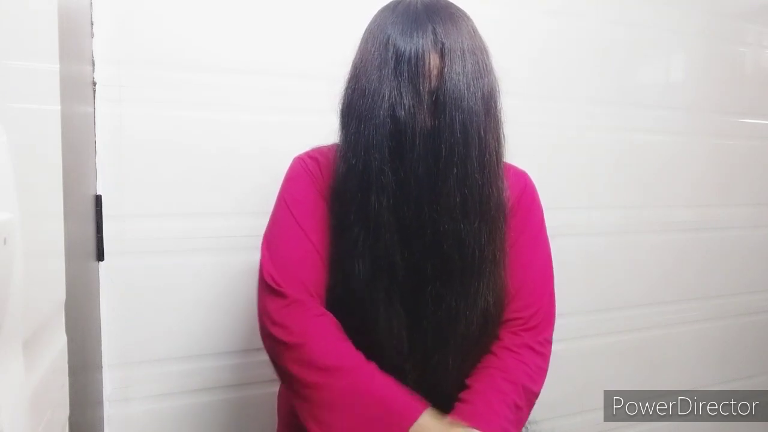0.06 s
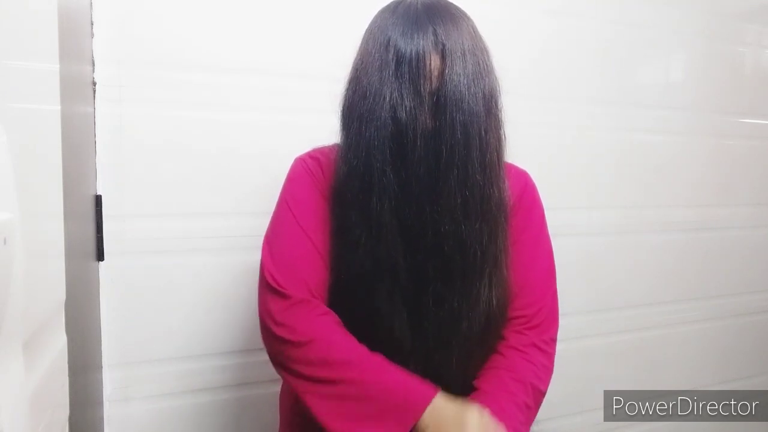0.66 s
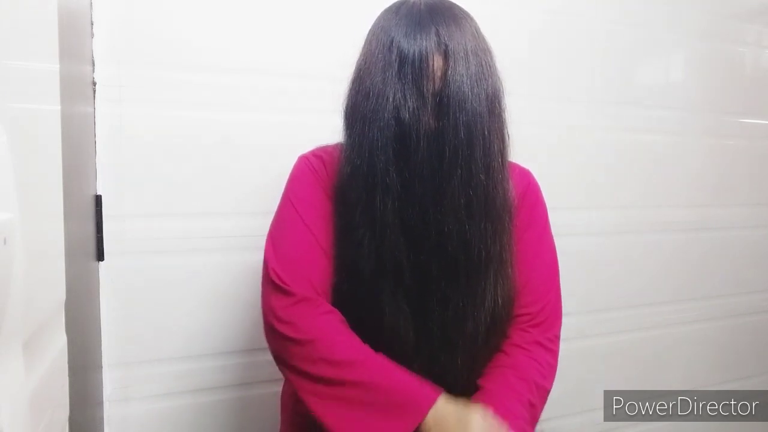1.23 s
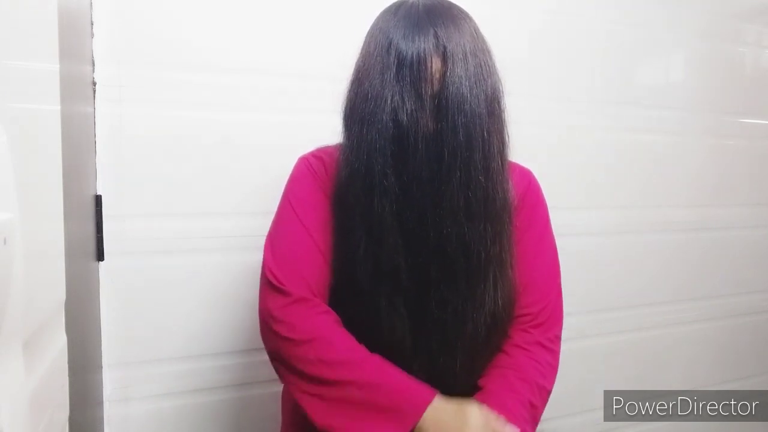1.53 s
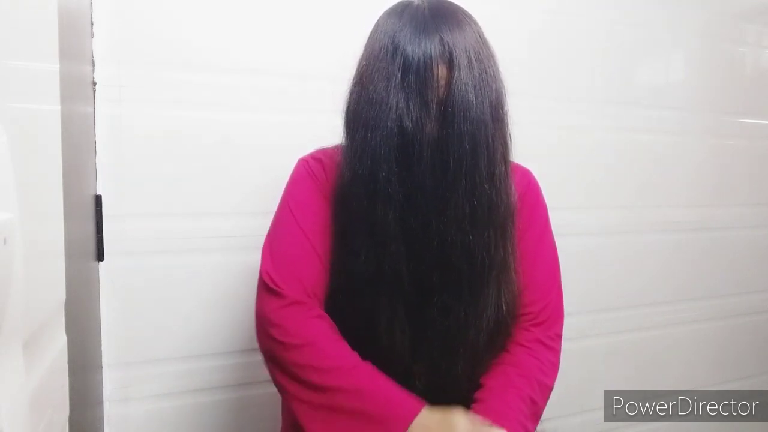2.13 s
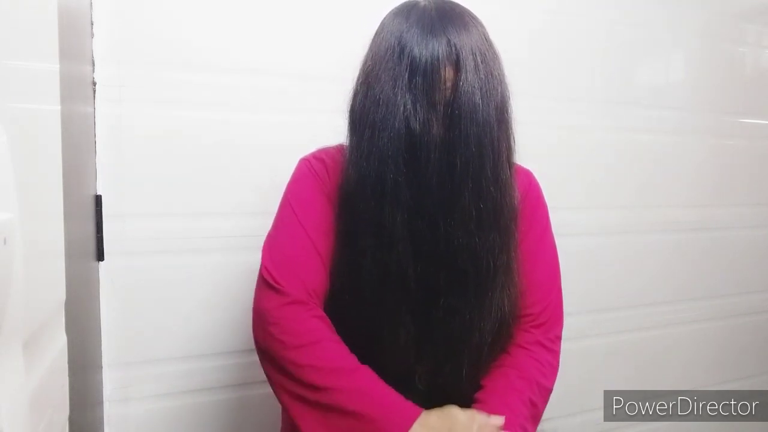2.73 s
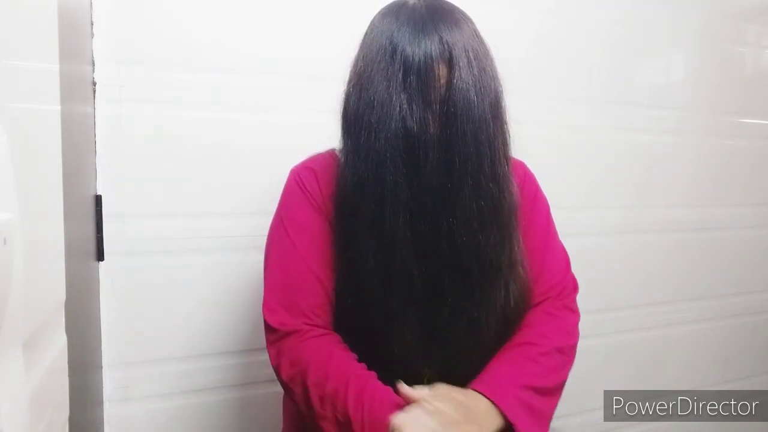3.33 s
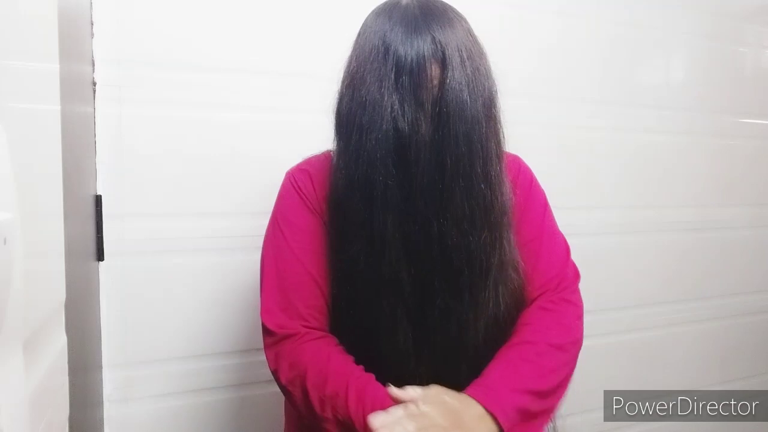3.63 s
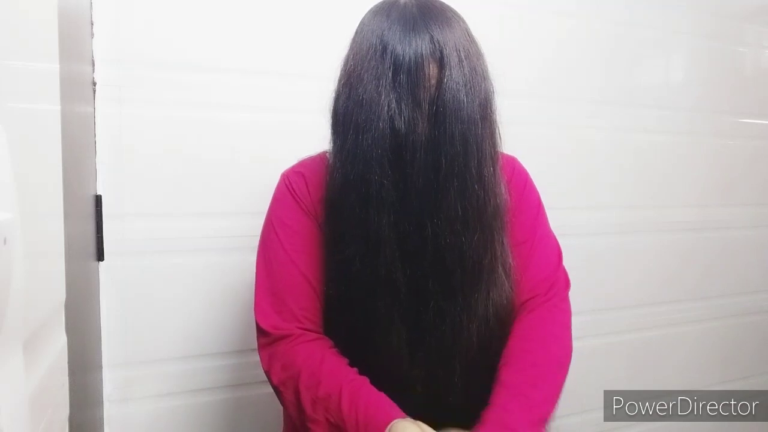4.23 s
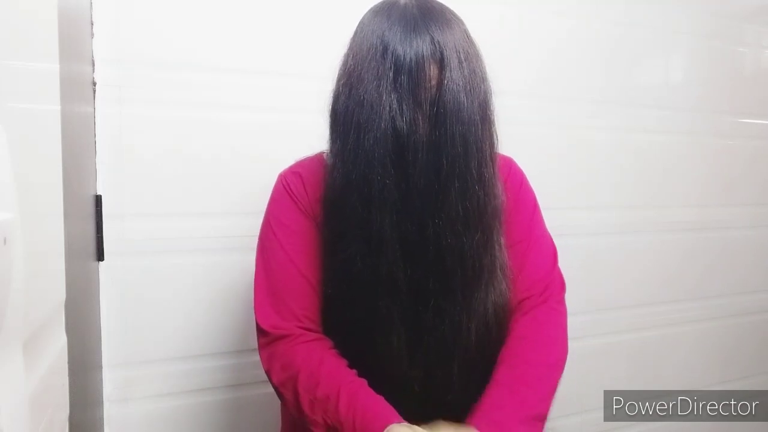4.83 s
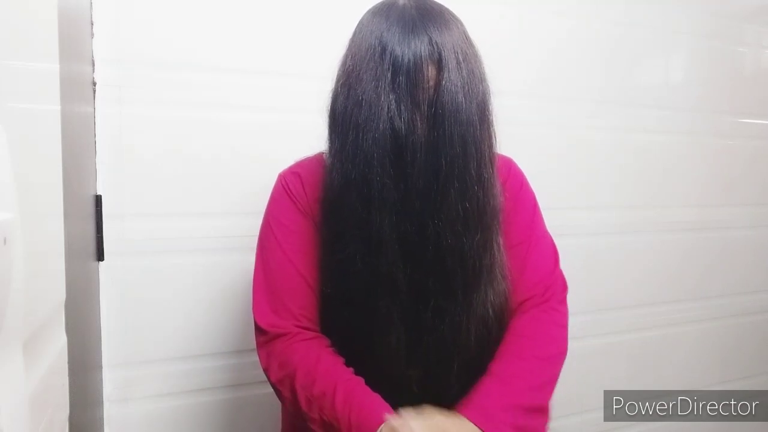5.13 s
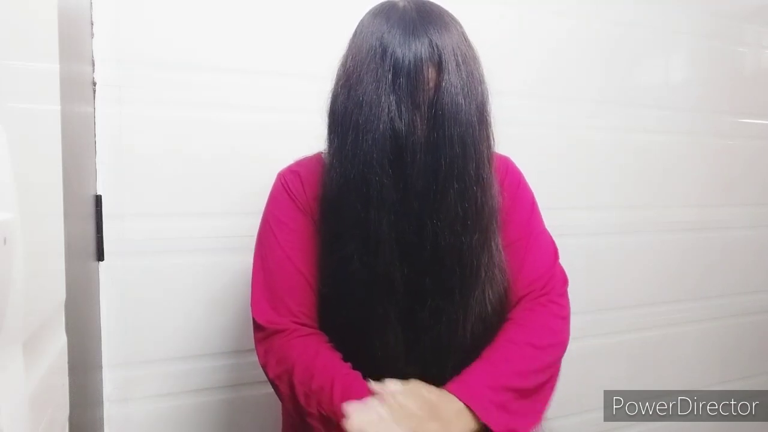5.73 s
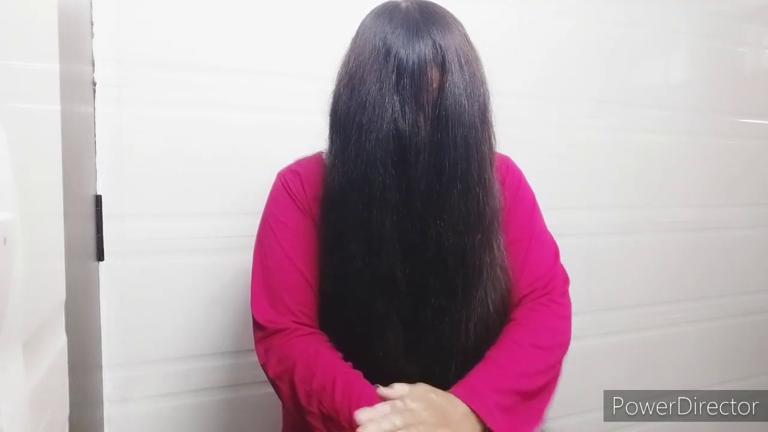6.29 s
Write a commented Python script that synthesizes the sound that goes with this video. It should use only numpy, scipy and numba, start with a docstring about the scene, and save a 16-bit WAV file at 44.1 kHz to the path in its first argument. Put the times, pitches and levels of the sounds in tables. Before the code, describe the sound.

Two oiled palms rub together close to the microphone in a small room with hard, echoing walls and a steady low hum. The strokes are quick and softly hissing, about seven a second, flecked with tiny bubble pops. In the first second, four small wet crackles sound as the oil film tears. A faint, distant two-tone whistle wavers in a few short blasts until about 1.2 seconds. From 1 to 3 seconds the rubbing stays light, with thin high ticks and small slurps of air. It pauses briefly around 3 seconds. From about 3.5 seconds the hands resume and press harder, making a busy run of sticky squelches and fizzing crackles. These are loudest between about 4.5 and 5.6 seconds, then ease a little as the rubbing continues to the end, just after 6 seconds.

```python
"""Oiled palms rubbing and squeezing

Two oiled palms rub together close by in a small room with hard walls. Each stroke hisses softly as
the skin slides. The oil film tears in crackling bursts that ring the air pockets between the hands,
busier and louder in the second half. Thin oil threads tick, and air slurps out of closing gaps.
Behind it all are a low room hum and, at first, a faint far whistle."""
import sys
import numpy as np
from scipy import signal
from scipy.fft import rfft, irfft, next_fast_len
from scipy.io import wavfile
from scipy.ndimage import uniform_filter1d
from numba import njit

SR = 44100
rng = np.random.default_rng(int(sys.argv[2]) if len(sys.argv) > 2 else 0)


def waveform_to_disk(signal):
    """Save audio, clipped to [-1, 1], as 16-bit WAV at the path in sys.argv[1]."""
    frames = np.transpose(np.atleast_2d(signal))
    scaled = np.clip(frames, -1, 1) * 32767
    samples = np.round(scaled).astype(np.int16)
    wavfile.write(sys.argv[1], SR, samples)


N = 280476
TIME = np.arange(N) / SR
BURST = np.arange(2048) / SR  # time within one short sound, in seconds
SNAP_S = .008  # a tear starts this long before its main snap

# Each tear of the oil film: t/s, pocket level/dB, tear time scale/ms, pocket f/Hz,
# palm hollow f/Hz, hollow level/dB, fizz level/dB
FILM_TEARS = [(0.0301, -38.5, 1, 3300, 1100, -45.5, -43), (0.3198, -35.5, 1.35, 3700, 898, -47, -46),
              (0.6011, -31.5, 1.3, 3170, 1590, -40.5, -32), (0.8803, -34.5, 1.6, 3650, 940, -40.5, -40.5),
              (3.5278, -43, 4.6, 4270, 1900, -47, -40.5), (3.5349, -35, 2.2, 4000, 1620, -38.5, -33),
              (3.6674, -37.5, 7.5, 3920, 464, -50, -41.5), (3.7877, -42.5, 1.9, 2830, 1540, -46, -42),
              (3.9184, -32.5, 2.2, 4040, 684, -41, -38), (3.9347, -35.5, 1.6, 4440, 590, -60, -34),
              (4.0439, -37, 1.6, 4000, 1630, -42.5, -39), (4.1756, -34, 1, 4020, 780, -42.5, -45),
              (4.2744, -30.5, 1.5, 4380, 1250, -49, -35), (4.3065, -39, 3.1, 3420, 504, -48, -44),
              (4.4333, -33, 2.7, 4430, 596, -44.5, -50), (4.4416, -36, 4, 3730, 579, -58, -29),
              (4.5468, -24, 1.03, 4320, 1580, -34.5, -36), (4.7, -32, 0.92, 4560, 645, -46, -46),
              (4.7133, -37, 2, 7400, 730, -58, -32), (4.8172, -35.5, 2.4, 3940, 1050, -49, -42),
              (4.8382, -42, 1.9, 4400, 1530, -45, -44), (4.9567, -35, 1.8, 3540, 1370, -46, -36.5),
              (4.9919, -51, 2.2, 5700, 543, -34.5, -28.5), (5.0905, -20, 1.9, 6000, 2030, -40, -22),
              (5.0938, -22, 2.9, 4170, 975, -37, -28), (5.2376, -39, 2.1, 3970, 2000, -48, -39),
              (5.36, -22.5, 2.3, 4900, 2097, -36, -21), (5.5204, -32.5, 2.4, 3800, 715, -44, -33.5),
              (5.6294, -27, 1, 4260, 1530, -42.5, -34), (5.6608, -35.5, 2.5, 2690, 2070, -47, -37),
              (5.7928, -37.5, 2, 3770, 1270, -46.5, -39.5), (5.8397, -46, 5, 2890, 540, -39.5, -42.5),
              (5.9268, -41, 2.4, 2470, 1750, -43, -43), (6.0686, -35, 4.2, 3920, 570, -42, -37),
              (6.1763, -40.5, 1.2, 3800, 1090, -47.5, -42), (6.1975, -39.5, 2, 2460, 1680, -44, -37)]


def undb(db):
    """Turn decibels into a number to multiply by."""
    return 10 ** (np.asarray(db) / 20)


def unit(x):
    """Scale a signal to an average strength (rms) of 1."""
    return x / np.sqrt(np.mean(x ** 2))


def sized(x, db):
    """Give a short sound as much energy as 10 ms of steady sound at level db."""
    return x * undb(db) * np.sqrt(.01 * SR / np.sum(x ** 2))


def at_hz(points, hz):
    """Read between the rows of a (frequency, value) table, on a log-frequency scale."""
    f, value = np.transpose(points)
    return np.interp(np.log(hz + 1), np.log(f), value)


def colour(x, points):
    """Make the lows and highs louder or softer, following rows of f/Hz, gain/dB."""
    size = next_fast_len(2 * len(x), True) // 2 * 2
    gain = undb(at_hz(points, np.arange(size // 2 + 1) * SR / size))
    cepstrum = irfft(np.log(gain))
    cepstrum[1:size // 2] *= 2  # folded so the filter rings only after a sound, never before
    cepstrum[size // 2 + 1:] = 0
    return irfft(rfft(x, size) * np.exp(rfft(cepstrum)))[:len(x)]


def drift(rate):
    """A smooth random wobble of size 1 that takes about `rate` steps a second."""
    hold = max(int(SR / rate), 2)
    steps = np.repeat(rng.standard_normal(N // hold + 1), hold)
    return unit(uniform_filter1d(uniform_filter1d(steps, hold), hold)[:N])


@njit
def resonate(x, hz, q):
    """Make x ring at a pitch that may move every sample; a higher q rings longer."""
    y, band, low = np.empty(len(x)), 0., 0.
    for i in range(len(x)):
        g = np.tan(np.pi * min(hz[i] / SR, .45))
        v = (band + g * (x[i] - low)) / (1 + g * (g + 1 / q))
        band, low, y[i] = 2 * v - band, low + 2 * g * v, v / q
    return y


def ring(x, hz, q):
    """Make x ring at one steady pitch."""
    return resonate(x, np.full(len(x), float(hz)), q)


def grains(count, spread_db, cap):
    """Gritty noise: mostly small clicks, with a few much bigger ones."""
    sizes = undb(spread_db * np.minimum(rng.exponential(size=count), cap))
    return rng.standard_normal(count) * sizes


def add(track, s, sound):
    """Mix a short sound in at s seconds."""
    start = int(s * SR)
    track[start:start + len(sound)] += sound[:N - start]


def room_tone(air_db=-54.5, hum_boost_db=3., sway_db=1.8):
    """Low, steady air noise with a wavering hum in it; the higher tones waver more."""
    # Colour of the room's air noise: f/Hz, gain/dB
    air_colour = [(20, -27), (45, -21), (65, -8), (90, -8.5), (200, 1.5), (270, -5), (420, -1), (560, -5.5),
                  (850, -15), (1400, -20), (4500, -20), (6500, -25), (15000, -24)]
    # Tones of the hum: f/Hz, level before the boost/dB
    hum_tones = [(48.4, -76.5), (91.5, -68), (140, -70.5), (199.2, -71), (393, -66.5)]
    out = unit(colour(rng.standard_normal(N), air_colour)) * undb(air_db)
    for hz, db in hum_tones:
        pitch = hz + (2 + .01 * hz) * drift(14)
        phase = 2 * np.pi * np.cumsum(pitch) / SR
        out += unit(np.sin(phase)) * undb(db + hum_boost_db + sway_db * np.tanh(drift(9)))
    return out


def blast(start, length, swell_s=.018, fade_s=.073):
    """The strength of one whistle blast: it swells, holds and dies away."""
    swell = np.clip((TIME - start) / swell_s, 0, 1)
    return swell * np.exp(-np.maximum(TIME - start - length, 0) / fade_s)


def whistle(low_hz=2616, high_hz=3020, waver=.006, flicker_db=3., rough=.35):
    """A far whistle sounds two thin, rough, wavering tones."""
    # Whistle blasts: start/s, length/s, lower tone level/dB, upper tone level/dB
    blasts = [(0, 0.28, -60.5, -66), (0.483, 0.14, -54, -56.5), (.7, 0.44, -64.5, -67),
              (1.068, .07, -58, -67)]
    out = np.zeros(N)
    for k, hz in enumerate((low_hz, high_hz)):
        phase = 2 * np.pi * np.cumsum(hz * (1 + waver * drift(131))) / SR
        tone = np.sin(phase) + rough * drift(180) * np.cos(phase)
        swells = [blast(start, length) * undb(levels[k]) for start, length, *levels in blasts]
        out += unit(tone) * np.max(swells, axis=0) * undb(flicker_db * drift(60))
    return out


def sliding(width_s=.028):
    """How strong the rubbing is: each stroke speeds up and slows down, and pressing makes it louder."""
    # Runs of even back-and-forth strokes: middle of the first/s, rough middle of the last/s, rate/Hz
    runs = [(0.028, 1.3, 7.08), (1.466, 2.95, 6.7), (3.41, 4.98, 7.68), (5.534, 6.35, 7.4)]
    # How hard the palms press: t/s, hiss level at the peak of a stroke/dB
    pressure = [(0, -51.5), (0.9, -54.5), (1.5, -52), (2.4, -54.5), (2.9, -53), (3.55, -55.5), (3.9, -50),
                (4.5, -47.5), (5.6, -46.5), (6.36, -50)]
    speed = np.zeros(N)
    for first, last, rate in runs:
        for middle in first + np.arange(round((last - first) * rate) + 1) / rate:
            speed += np.exp(-.5 * ((TIME - middle) / width_s) ** 2)
    return speed * undb(np.interp(TIME, *np.transpose(pressure)))


def rubbing(slide, sizzle_db=-22.5):
    """Oily skin hisses with countless tiny slips, and the oil sizzles at the peak of each stroke."""
    # Colour of sliding skin: f/Hz, gain/dB
    skin_colour = [(400, -12.5), (1000, 0), (2000, 1.5), (4000, 3.5), (6500, 2), (10000, -1.5),
                   (15000, 4.5)]
    hiss = unit(colour(grains(N, spread_db=3.5, cap=2 * np.pi), skin_colour))
    sizzle = unit(ring(grains(N, spread_db=8.5, cap=2 * np.pi), hz=13500, q=4.))
    stroke_average = uniform_filter1d(slide, SR // 7) + undb(-80)
    return slide * (hiss + undb(sizzle_db) * slide / stroke_average * sizzle)


def crackle(slide, count=260, low_hz=2600, high_hz=15000, fade_cycles=6.9):
    """Tiny oil bubbles burst and ring briefly, most often where the palms press hardest."""
    out = np.zeros(N)
    pressing = np.cumsum(slide ** 2)
    for when, pitch, size in rng.random((count, 3)):
        i = np.searchsorted(pressing, when * pressing[-1])
        hz = low_hz + pitch * (high_hz - low_hz)
        bubble = np.sin(2 * np.pi * hz * BURST) * np.exp(-BURST * hz / fade_cycles)
        relative_db = -8 - 2.5 * np.log(max(size, .05))
        add(out, i / SR, sized(bubble, relative_db) * slide[i])
    return out


def tear(ms, spread_db=6.5, snap=.44, linger=2.78, lead_db=-21.):
    """An oil film parts: a few first breaks, one snap, then a dying spray of tiny uneven breaks."""
    progress = (BURST - SNAP_S) * 1000 / ms  # a slow tear also starts slowly
    build_up = undb(lead_db) * np.exp(-abs(progress))
    fade = np.exp(-abs(progress) / linger)
    spray = grains(len(BURST), spread_db, cap=np.pi) * np.where(progress < 0, build_up, fade)
    spray /= np.linalg.norm(spray)
    spray[int(SNAP_S * SR)] += snap
    return spray


def squeezed_pitch(hz, rise=.09, rise_s=.017):
    """A shrinking air pocket rises in pitch after the snap."""
    since_snap = np.maximum(BURST - SNAP_S, 0)
    return hz * (1 + rise * (1 - np.exp(-since_snap / rise_s)))


def air_pocket(breaks, hz, db):
    """A small air pocket rings, and the flesh soaks up the treble above its note."""
    pitch = squeezed_pitch(hz)
    note = resonate(resonate(breaks, pitch, q=2.5), pitch, q=1.)
    return sized(colour(note, [(hz * 1.2, 0), (hz * 1.5, -12)]), db)


def palms(breaks, hz, db, tight_above_hz=900):
    """The hollow of the palms rings and the flesh thuds; a small, tight hollow adds a clearer note."""
    pitch = squeezed_pitch(hz)
    hollow = colour(resonate(breaks, pitch, q=1.95), [(2000, 23.), (5000, -3.5)])
    clear_note = sized(resonate(hollow, pitch, q=5.7), -6.5) * (hz > tight_above_hz)
    thud = ring(breaks, hz=350, q=.86)
    return sized(sized(hollow, 0) + clear_note, db) + sized(thud, db - 13)


def foam(ms, small_hz=8800, tiny_hz=13800):
    """Oil bubbles of two sizes fizz as they burst, over a broad wet crack."""
    # Colour of the wet crack: f/Hz, gain/dB
    crack_colour = [(300, -24), (650, 9.5), (3000, 5.5), (6300, 16), (11000, 5), (15000, 16.5)]
    small, tiny = (ring(tear(ms, spread_db=14., snap=.17, linger=3.7), hz, q=1.6)
                   for hz in (small_hz, tiny_hz))
    crack = colour(tear(ms), crack_colour)
    return sized(small, 1.5) + sized(tiny, 0) + sized(crack, 6)


def squelches():
    """Each tear of the oil film rings an air pocket and the hollow of the palms, and the foam fizzes."""
    out = np.zeros(N)
    for s, pocket_db, ms, pocket_hz, hollow_hz, hollow_db, fizz_db in FILM_TEARS:
        breaks = tear(ms)
        ringing = air_pocket(breaks, pocket_hz, pocket_db) + palms(breaks, hollow_hz, hollow_db)
        fizz = sized(foam(ms), fizz_db + .5)
        add(out, s - SNAP_S, ringing + fizz)
    return out


def tick(hz, db, q=2.5, second_q=.95, ms=.49):
    """A thin thread of oil breaks with a very short, high tick."""
    breaks = tear(ms, lead_db=-17.)
    return sized(ring(ring(breaks, hz, q), hz, second_q), db)


def lone_threads():
    """Now and then a single oil thread snaps."""
    # Snapping oil threads: t/s, level/dB, f/Hz
    snaps = [(0.129, -49, 5000), (0.6877, -44.5, 4580), (1.1723, -43.5, 6800), (1.2653, -38, 4820),
             (1.2651, -39.5, 13000), (1.621, -50, 13000), (1.762, -46.5, 13200), (2.3517, -52, 13300),
             (2.5327, -50, 13000), (2.605, -47.5, 12400), (2.8707, -49.5, 3900), (3.0733, -46.5, 4460),
             (4.0102, -43.5, 6200), (4.155, -46, 11000), (4.9978, -37, 8700), (6.1978, -38, 12100),
             (6.3311, -41.5, 6840)]
    out = np.zeros(N)
    for s, db, hz in snaps:
        add(out, s - SNAP_S, tick(hz, db))
    return out


def slurps(climb=1.38):
    """Air rushes through a narrow gap, and its pitch climbs as the gap closes."""
    # Air pressed out of closing gaps: t/s, level/dB, starting f/Hz
    gaps = [(0.851, -51, 2800), (1.141, -51, 3000), (1.464, -51, 2500), (1.745, -56, 2370),
            (2.888, -48.5, 3600), (2.932, -57.5, 2400), (3.4, -57.5, 2290)]
    out = np.zeros(N)
    for s, db, hz in gaps:
        rush = rng.standard_normal(len(BURST)) * np.hanning(len(BURST))
        pitch = np.geomspace(hz, hz * climb, len(BURST))
        add(out, s, sized(resonate(rush, pitch, q=9.), db))
    return out


def peeling(hard_from_s=3.7, ahead_s=.021, scatter_s=.005, low_hz=4000, high_hz=9000):
    """In a hard squeeze one oil thread lets go just before the film tears."""
    out = np.zeros(N)
    times = np.array([row[0] for row in FILM_TEARS])
    first_of_stroke = np.diff(times, prepend=0) > .06
    for s in times[first_of_stroke & (times > hard_from_s)]:
        when, pitch = rng.random(2)
        snap_at = s - ahead_s + scatter_s * (when - .5)
        hz = low_hz + pitch * (high_hz - low_hz)
        add(out, snap_at - SNAP_S, tick(hz, db=-48.5, q=1.6, second_q=.7, ms=1.1))
    return out


def body_echo(x, delay_s=.001855, echo_db=-20.5):
    """The body just behind the hands throws the sound straight back, slightly changing its colour."""
    echo = undb(echo_db) * np.interp(TIME - delay_s, TIME, x)
    return (x + echo) / np.hypot(1, undb(echo_db))


def room_echo(x, echo_db=-6.5, build_s=.009):
    """Hard walls return a wash of echoes that builds quickly and loses its treble first."""
    # How long the room rings: f/Hz, time to fade by 60 dB/s
    fade_times = [(500, 1), (1400, 0.51), (4000, 0.55), (5600, 0.4), (15000, 0.42)]
    t = np.arange(SR) / SR
    noise, tail = rfft(rng.standard_normal(SR)), 0
    hz = np.arange(len(noise))
    edges = np.geomspace(100, SR / 2, 13)
    for lo, hi in zip(edges, edges[1:]):
        band = irfft(noise * ((hz >= lo) & (hz < hi)))
        tail = tail + band * np.exp(-np.log(1000) * t / at_hz(fade_times, np.sqrt(lo * hi)))
    tail *= 1 - np.exp(-(t / build_s) ** 2)
    return undb(echo_db) * signal.fftconvolve(x, tail / np.linalg.norm(tail))[:N]


def scene(thread_echo_db=-3):
    """The hands, their echoes and the background; the threads echo less than the palms do."""
    slide = sliding()
    threads = lone_threads() + peeling()
    hands = body_echo(squelches()) + slurps() + rubbing(slide) + crackle(slide)
    echoes = room_echo(hands + undb(thread_echo_db) * threads)
    return (hands + threads + echoes + whistle() + room_tone())[None]


def record(dry, bass_hz=38, top_hz=15400):
    """The phone cuts the deep bass and the highest treble."""
    bass_cut = signal.butter(6, bass_hz, "high", fs=SR, output="sos")
    treble_cut = signal.ellip(10, .2, 70, top_hz, fs=SR, output="sos")
    return signal.sosfilt(treble_cut, signal.sosfilt(bass_cut, dry))


dry = scene()
out = record(dry)
waveform_to_disk(out)
```